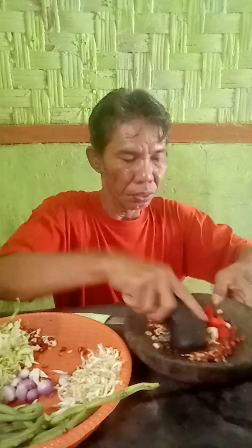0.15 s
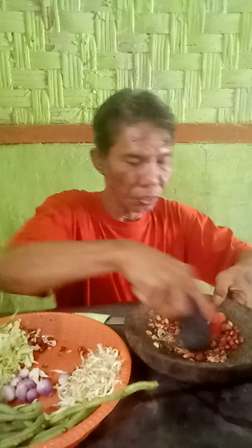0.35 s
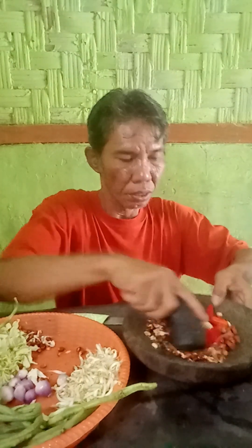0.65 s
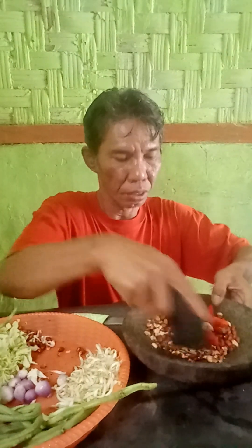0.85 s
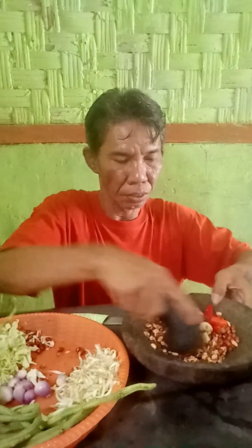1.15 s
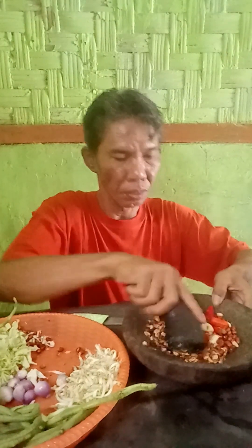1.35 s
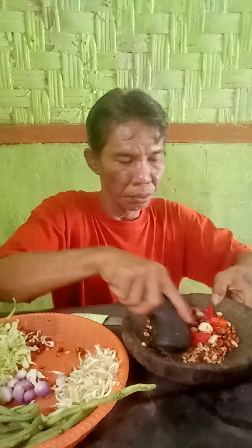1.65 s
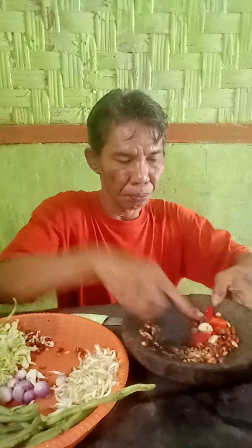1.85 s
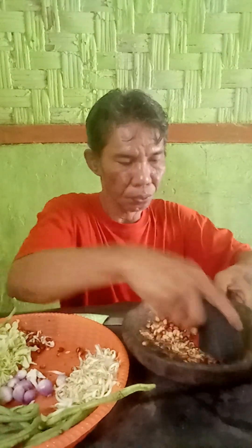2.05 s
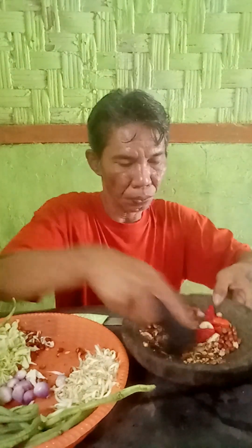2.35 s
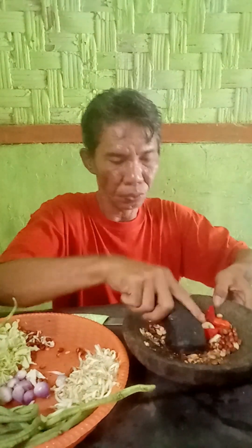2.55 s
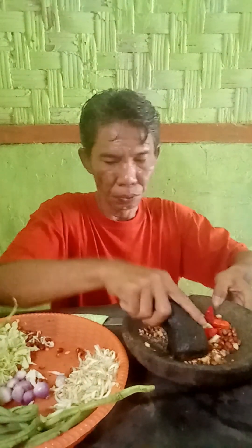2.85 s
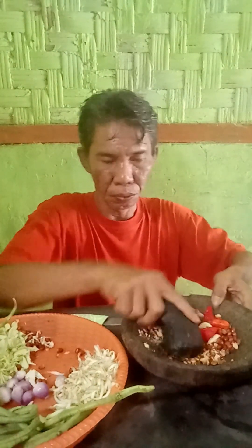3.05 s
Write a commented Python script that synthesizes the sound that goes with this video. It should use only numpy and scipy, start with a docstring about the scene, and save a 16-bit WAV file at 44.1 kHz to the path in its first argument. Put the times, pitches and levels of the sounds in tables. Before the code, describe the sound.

A stone pestle grinds nuts and spices in a stone mortar, close by in a small room. Quick rasping, rumbling strokes alternate with ringing knocks and crunching kernels, with harder knocks about halfway and near the end.

```python
"""A shallow stone mortar on a table in a small room, close to one microphone: nuts and spices are crushed.
From the start the stone pestle is pushed over the grit in quick strokes: the mortar rumbles and judders,
stone rasps on stone and the pestle sings. Between strokes it lands with a knock and a short ring, while
kernels crunch and crack and chillies pop. It lands hard about halfway through and again near the end,
where a last run of squeaking strokes and a knock close the three seconds."""
import sys
import numpy as np
from scipy import signal
from scipy.fft import rfft, irfft
from scipy.io import wavfile
from scipy.ndimage import uniform_filter1d, map_coordinates

SR = 44100
rng = np.random.default_rng(int(sys.argv[2]) if len(sys.argv) > 2 else 0)


def generate_wav(signal):
    """Clip the signal to [-1, 1] and save it as 16-bit WAV at the path in sys.argv[1]."""
    frames = np.transpose(np.atleast_2d(signal))
    scaled = np.clip(frames, -1, 1) * 32767
    pcm = np.round(scaled).astype(np.int16)
    wavfile.write(sys.argv[1], SR, pcm)


N = 141120
T = np.arange(N) / SR
CUTOFF_HZ = 15700   # top of the microphone's range
GRIT_PER_S, GRIT_SPREAD_DB = 5500, 2
ROLL_DEPTH, ROLL_HZ = 0.011, 44.64   # the rolling point of contact pulls the resonances about

# Resonances of the table, the mortar's body, the stone faces and the pestle: pitch_hz, level_db, t60_s
TABLE_MODES = [(153.1, -3, 0.12), (195.9, 0, 0.072), (255.4, 1, 0.048)]
MORTAR_MODES = [(314, -7, 0.089), (406.5, 2.5, 0.067), (464, 1, 0.13), (533, -10, 0.023)]
FACE_MODES = [(734, -3.5, 0.026), (916, -2.5, 0.012), (1110, 1.5, 0.027), (1271, -1.5, 0.015),
              (1370, -0.5, 0.02), (1686, 1.5, 0.027), (1811, -0.5, 0.064), (2444, -6, 0.0048)]
PESTLE_MODES = [(2086, 14, 0.037), (2194.5, 0.5, 0.11)]
# High resonances of the mortar's bowl: pitch_hz, level_db, t60_s
BOWL_MODES = [(2370, 0, 0.0032), (3060, 6, 0.0035), (4700, -9, 0.0079), (5096, 3.5, 0.012),
              (5265, 2, 0.0035), (5800, -1, 0.0076)]
# Spectrum of breaking crumbs: frequency_hz, level_db
CRUNCH_SPECTRUM = [(300, -12), (2000, -8), (4000, -1), (6500, -2), (8500, -6), (13500, 1), (15000, -9),
                   (15700, -31)]
# Pushes of the pestle: peak_s, rise_s, fall_s, boom_db, rumble_db, rasp_db, ring_db, grit_db, crunch_db
GRINDING_STROKES = [ (.005, 0.06, 0.049, -33, -27.5, -38, -46, -40.5, -37),
                    (0.096, 0.009, 0.017, -26, -33, -30, -23, -50, -43),
                    (.122, 0.043, 0.018, -31, -30.5, -28, -42, -35, -42),
                    (0.164, 0.025, 0.031, -32.5, -19.5, -21.5, -26, -31, -38),
                    (0.196, 0.039, 0.046, -35.5, -30.5, -55, -66, -45.5, -46),
                    (0.272, 0.04, 0.014, -33.5, -54, -42, -65, -53, -57),
                    (0.374, 0.0058, 0.027, -23.5, -23, -24, -25, -39, -35.5),
                    (0.439, 0.046, 0.042, -30, -30, -31.5, -38, -37, -32.5),
                    (0.495, 0.015, 0.017, -30.5, -30.5, -64, -67, -50, -48),
                    (0.538, 0.028, 0.049, -40, -29, -36.5, -39.5, -37, -34),
                    (0.645, 0.013, 0.043, -56, -37, -42.5, -69, -43.5, -48),
                    (0.679, 0.053, 0.093, -38, -48, -53, -51.5, -62, -55),
                    (0.743, 0.014, 0.053, -32.5, -25, -37.5, -44.5, -42.5, -40),
                    (0.97, 0.0084, 0.027, -30.5, -24.5, -30.5, -30, -62, -38),
                    (1.024, 0.043, 0.065, -31.5, -35.5, -41, -45, -42.5, -40.5),
                    (1.114, 0.014, 0.039, -43, -30, -44, -45, -38, -36),
                    (1.204, 0.012, 0.092, -37, -37, -61, -68, -52.5, -75),
                    (1.264, 0.038, 0.049, -34.5, -45, -50.5, -44.5, -60, -58),
                    (1.38, 0.05, 0.042, -36, -30.5, -39, -46, -48.5, -44),
                    (1.616, 0.0061, 0.08, -57, -25, -28, -35, -51, -54),
                    (1.64, 0.0047, 0.028, -28, -20.5, -26.5, -18, -45, -57),
                    (1.726, 0.014, 0.028, -28, -19.5, -28, -44, -45, -57),
                    (1.741, 0.0086, 0.034, -27, -15.5, -22.5, -23, -46, -39),
                    (1.822, 0.002, 0.054, -31, -31, -55, -63, -56, -68),
                    (1.939, 0.022, 0.037, -24, -33, -32.5, -32, -39, -38),
                    (1.968, 0.013, 0.033, -37, -21.5, -36, -63, -41.5, -64),
                    (2.014, 0.0045, 0.011, -24.5, -19, -40, -54, -62, -75),
                    (2.056, 0.025, 0.054, -32, -30.5, -35.5, -53, -67, -85),
                    (2.191, 0.0073, 0.054, -35.5, -39, -32, -27.5, -64, -53),
                    (2.231, 0.029, 0.069, -34.5, -26, -32.5, -38, -41, -44.5),
                    (2.328, 0.027, 0.038, -37.5, -31, -42, -58, -41.5, -42),
                    (2.42, 0.047, 0.21, -47.5, -47.5, -62, -72, -69, -65),
                    (2.482, 0.015, 0.056, -43, -38.5, -39.5, -28.5, -59, -46),
                    (2.559, 0.044, 0.044, -30.5, -36, -48.5, -39, -61, -47),
                    (2.596, 0.024, 0.042, -36, -28, -45, -60, -45.5, -44),
                    (2.834, 0.023, 0.017, -29, -27, -31.5, -26, -40, -45),
                    (2.87, 0.018, 0.015, -48, -20.5, -22.5, -18, -39, -42),
                    (2.894, 0.069, 0.04, -29.5, -20.5, -28, -25.5, -38.5, -47),
                    (3.056, 0.033, 0.044, -39, -32, -43.5, -31.5, -63, -64),
                    (3.081, 0.019, 0.046, -32.5, -27, -31.5, -36, -46, -56),
                    (3.169, 0.029, 0.024, -56, -31, -39, -33, -46, -57)]


def grinding():
    """Grit under the pestle excites table, mortar, stone faces and pestle, while crumbs break."""
    power = sum(np.outer(from_db(levels), swell(peak, rise, fall)) ** 2
                for peak, rise, fall, *levels in GRINDING_STROKES)
    boom, rumble, rasp, song, sand, crunch = power
    clumps = rms_one(from_db(2 * wander(hz=148))) ** 2   # crumbs break in clusters
    grit = grains(GRIT_PER_S, GRIT_SPREAD_DB)
    crumbs = grains(per_s=2000, spread_db=1.5)
    layers = [(boom, ring(ring(grit, TABLE_MODES), TABLE_MODES)),
              (rumble, ring(grit, MORTAR_MODES)),
              (rasp, waver(ring(grit, FACE_MODES), ROLL_DEPTH, ROLL_HZ)),
              (song, waver(ring(grit, PESTLE_MODES), ROLL_DEPTH, ROLL_HZ)),
              (sand * clumps, ring(crumbs, BOWL_MODES)),
              (crunch * clumps, colour(crumbs, CRUNCH_SPECTRUM))]
    return sum(np.sqrt(layer_power) * steady(sound) for layer_power, sound in layers)


# The stone's clink, its high overtones and the mortar's rim: pitch_hz, level_db, t60_s
CLINK_MODES = [(4505, 0, 0.055)]
OVERTONE_MODES = [(7200, -1.5, 0.02), (7480, 6.5, 0.04), (9430, -9, 0.034), (10550, -2.5, 0.014),
                  (11280, -8, 0.018), (12900, -7, 0.009), (14400, -6, 0.023)]
RIM_MODES = [(2621, -2, 0.15), (3200, -6.5, .1), (3430, -10.5, 0.047), (4980, -6, 0.14)]
# The pestle lands: start_s, thud_db, clack_db, ring_db, ring_pitch_hz, clink_db, overtone_db
LANDINGS = [(0.24, -27.5, -33.5, -57, 2110, -75, -70), (0.3634, -31.5, -49, -29, 2080, -53, -50),
            (0.9592, -39, -34, -36.5, 1920, -65, -62), (1.035, -37, -31, -30.5, 1945, -54, -46),
            (1.303, -32.5, -45, -36.5, 2100, -58, -54.5), (1.558, -19.5, -25.5, -19, 2090, -40, -49.5),
            (1.8394, -36.5, -30, -23.5, 2095, -44.5, -38.5), (2.158, -43, -21.5, -18.5, 2048, -52, -51),
            (2.466, -48, -38, -31.5, 2060, -43, -51), (2.7771, -23, -20.5, -17, 2150, -32.5, -46),
            (2.8266, -23.5, -24.5, -23, 2080, -38, -52), (2.984, -71, -60, -37, 2120, -48, -46.5),
            (3.013, -39.5, -45, -33, 2020, -62, -49), (3.193, -34, -45, -27, 2140, -36, -43)]


def knocks():
    """Stone meets stone: a clack, the pestle's ring, the rim's after-ring, then a thud on the table."""
    out, t = np.zeros(N), T[:SR // 4]
    click = signal.unit_impulse(len(t))
    chatter = dict(depth=0.0097, hz=220)   # a landing pestle chatters, which roughens its ring
    thud = ring(soften(click, 1180), MORTAR_MODES) + from_db(-8) * ring(soften(click, 450), TABLE_MODES)
    for start, thud_db, clack_db, ring_db, ring_hz, clink_db, overtone_db in LANDINGS:
        skitter = noise_burst(t, t60_s=0.1)   # the pestle skitters on grit as it lands
        contact = click + from_db(-1.5) * skitter / np.linalg.norm(skitter)
        cushioned = soften(contact, 3200)
        faces = [(hz, db + rng.normal(0, 0.37), t60 * 0.21) for hz, db, t60 in FACE_MODES]
        clack = ring(soften(contact, 2110), faces)
        pestle = from_db(ring_db) * struck(ring(cushioned, PESTLE_MODES, ring_hz / PESTLE_MODES[0][0]))
        clink = from_db(clink_db) * struck(ring(contact, CLINK_MODES))
        # the overtones shift with each point of contact, and lie lower when the pestle is not pressed down
        shifted = [(hz * (1 + rng.normal(0, 0.018)), db, t60) for hz, db, t60 in OVERTONE_MODES]
        overtones = ring(contact, shifted, tuning=0.98)
        add(out, start, from_db(clack_db) * struck(clack))
        add(out, start, waver(pestle + clink, **chatter))
        add(out, start, from_db(overtone_db) * struck(waver(overtones, **chatter)))
        add(out, start, from_db(ring_db - 20) * struck(ring(cushioned, RIM_MODES)))
        add(out, start + 0.00363, from_db(thud_db) * struck(thud))
    return out


# Resonances of the stone's squeak: pitch_hz, level_db, t60_s
SQUEAK_MODES = [(5030, 0.18, 0.032), (5346, -2.2, 0.017)]
# Slides on bare stone: peak_s, rise_s, fall_s, overtone_pitch_hz, clink_db, squeak_db, overtone_db
BARE_SLIDES = [(0.099, 0.018, 0.022, 7436, -47, -42, -40.5), (0.166, .032, 0.047, 7507, -38, -32.5, -40.5),
               (1.636, 0.019, 0.036, 7430, -39.5, -36.5, -37), (1.743, .04, 0.036, 7440, -45, -44, -41),
               (2.487, 0.02, 0.047, 7090, -37, -53, -53), (2.885, .04, 0.044, 7480, -39.5, -35, -37),
               (3.073, 0.035, 0.046, 7280, -52, -43, -45), (3.169, 0.02, 0.026, 7400, -50, -46, -41.5)]


def skids():
    """Bare stone catches on stone: the high modes sing, the overtones shifting with each stroke's grip."""
    shapes = [swell(peak, rise, fall) ** 2 for peak, rise, fall, *_ in BARE_SLIDES]
    overtone_hz, clink_db, squeak_db, overtone_db = np.transpose(BARE_SLIDES)[3:]
    grip = overtone_hz @ shapes / sum(shapes) / OVERTONE_MODES[1][0]
    catches = grains(GRIT_PER_S, GRIT_SPREAD_DB)
    voices = [(clink_db, CLINK_MODES, 1), (squeak_db, SQUEAK_MODES, 1), (overtone_db, OVERTONE_MODES, grip)]
    out = 0
    for db, modes, tuning in voices:
        singing = waver(ring(catches, modes), ROLL_DEPTH, ROLL_HZ, tuning)
        out = out + np.sqrt(from_db(db) ** 2 @ shapes) * steady(singing)
    return out


# Brief hums of the mortar under a juddering pestle: peak_s, rise_s, fall_s, pitch_hz, level_db
JUDDER_HUMS = [(0.17, 0.009, 0.01, 445, -14.5), (0.244, 0.0051, 0.0053, 419, -18),
               (1.384, 0.026, 0.012, 402, -17.5), (1.749, 0.004, 0.034, 429, -17),
               (2.053, 0.0052, 0.014, 412.3, -13.5), (3.104, 0.033, 0.018, 399.3, -22.5)]


def judders():
    """The pestle sticks and slips in step with the mortar's main resonance."""
    clock = np.cumsum(1 + 0.0298 * wander(hz=99)) / SR   # the pitch wobbles by about 3 percent
    return sum(from_db(db) * swell(peak, rise, fall) * np.sqrt(2) * np.sin(2 * np.pi * hz * clock)
               for peak, rise, fall, hz, db in JUDDER_HUMS)


# Spectrum of a splitting kernel: frequency_hz, level_db
CRACK_SPECTRUM = [(300, -5.5), (2600, 0), (4500, 2), (8500, -6.5), (14000, 1), (16000, -8)]
# Kernels split: start_s, level_db, lowpass_hz
KERNEL_CRACKS = [(0.3653, -32, 14900), (0.544, -28, 12400), (0.9587, -36.5, 14600), (1.0355, -28.5, 2950),
                 (1.205, -46.5, 4030), (1.84, -38, 9000), (1.924, -41, 15000), (2.022, -28.5, 9100),
                 (2.08, -40.5, 4350), (2.243, -36.5, 7650)]


def cracks():
    """A kernel splits in a very short, bright burst."""
    out = np.zeros(N)
    for start, db, lowpass_hz in KERNEL_CRACKS:
        burst = colour(noise_burst(T[:SR // 20], t60_s=0.023), CRACK_SPECTRUM)
        add(out, start, from_db(db) * struck(soften(burst, lowpass_hz)))
    return out


# Wet flesh gives way with a small rising pop: peak_s, pitch_at_peak_hz, level_db
CHILLI_POPS = [(0.243, 1100, -27.5), (.375, 930, -26), (0.645, 1014, -30.5), (1.036, 1042, -22.5),
               (1.965, 850, -23)]
POP_OCTAVES_PER_S = 99.5


def pops():
    """Air pockets in the squeezed chillies close, so their pitch shoots up."""
    out = 0
    for peak, hz, db in CHILLI_POPS:
        pitch = hz * 2 ** np.clip((T - peak) * POP_OCTAVES_PER_S, -0.5, 1)
        chirp = np.sqrt(2) * np.sin(2 * np.pi * np.cumsum(pitch) / SR)
        out = out + from_db(db) * swell(peak, rise_s=0.0043, fall_s=0.0085) * chirp
    return out


# Reflections from the table and near wall, then from the room: t60_s, level_db, delay_s
ROOM_REFLECTIONS = [(0.074, -6, 0.0033), (0.298, -19, 0.015)]
# Tone of the reflected sound: frequency_hz, gain_db
REFLECTION_SPECTRUM = [(100, 7), (400, -0.5), (2000, -6), (6000, 0), (15000, -6)]


def room(x):
    """The small room returns a dense early cluster of reflections and a fainter, longer tail."""
    t, response = T[:SR // 2], 0
    for t60, db, delay in ROOM_REFLECTIONS:
        tail = noise_burst(t, t60) * (t > delay)
        response = response + from_db(db) * tail / np.linalg.norm(tail)
    return signal.fftconvolve(x, colour(response, REFLECTION_SPECTRUM))[:N]


# Spectrum of the room's background: frequency_hz, level_db
ROOM_TONE_SPECTRUM = [(20, 12), (45, 4.5), (90, 1.5), (155, 6), (220, -7.5), (420, -20), (800, -18.5),
                      (2000, -24.5), (5000, -36), (15000, -55)]


def room_tone():
    """A faint, steady, low noise lies behind the mortar."""
    return from_db(-47) * rms_one(colour(rng.standard_normal(N), ROOM_TONE_SPECTRUM))


def from_db(db):
    """Decibels to gain."""
    return 10 ** (np.asarray(db) / 20)


def rms_one(x):
    """Scale to unit rms."""
    return x / np.sqrt(np.mean(x ** 2) + 1e-20)


def steady(x):
    """Hold the level at one while keeping the fine grain."""
    return x / np.sqrt(np.abs(uniform_filter1d(x ** 2, 500)) + 1e-12)


def struck(x):
    """Scale a blow to unit rms over its first 8.2 ms."""
    return x / np.sqrt(np.mean(x[:int(0.0082 * SR)] ** 2))


def soften(x, hz):
    """Gentle low-pass, as of a cushioned contact."""
    return signal.sosfilt(signal.butter(2, min(hz, CUTOFF_HZ), fs=SR, output="sos"), x)


def colour(x, points):
    """Minimum-phase filter through (frequency_hz, gain_db) points."""
    hz, db = np.transpose(points)
    size = 4096
    curve_db = np.interp(np.log(np.fft.rfftfreq(size, 1 / SR) + 1), np.log(hz), db)
    cepstrum = irfft(np.log(from_db(curve_db)))
    cepstrum[1:size // 2] *= 2
    cepstrum[size // 2 + 1:] = 0
    return signal.fftconvolve(x, irfft(np.exp(rfft(cepstrum))))[:len(x)]


def ring(x, modes, tuning=1):
    """Parallel modes of alternating sign; each level sets the mode's energy."""
    out = 0
    for k, (hz, db, t60) in enumerate(modes):
        radius = np.exp(-np.log(1000) / (t60 * SR))
        angle = 2 * np.pi * hz * tuning / SR
        mode = signal.lfilter([1, 0, -1], [1, -2 * radius * np.cos(angle), radius ** 2], x + 1e-18)
        out = out + (-1) ** k * from_db(db) * np.sqrt(1 - radius) * mode
    return out


def grains(per_s, spread_db):
    """Random clicks of uneven size."""
    sizes = from_db(spread_db * np.minimum(rng.exponential(1, N), 5)) * rng.choice([-1, 1], N)
    return sizes * (rng.random(N) < per_s / SR)


def noise_burst(t, t60_s):
    """White noise that dies away by 60 dB in t60_s."""
    return rng.standard_normal(len(t)) * np.exp(-np.log(1000) * t / t60_s)


def swell(peak_s, rise_s, fall_s):
    """Pressure builds to a peak and dies away; rise and fall each span 20 dB."""
    before = (np.maximum(peak_s - T, 0) / rise_s) ** 1.29
    after = np.maximum(T - peak_s, 0) / fall_s
    return from_db(-20 * np.minimum(before + after, 10))


def wander(hz, size=N):
    """Random drift of unit rms, mostly slower than hz."""
    return rms_one(soften(rng.standard_normal(size), hz))


def waver(x, depth, hz, tuning=1):
    """Let a ringing sound's pitch wander about its tuning."""
    speed = tuning * (1 + depth * wander(hz, len(x)))
    return map_coordinates(x, [np.cumsum(speed)], order=3, mode="mirror")


def add(out, start_s, x):
    """Mix a sound in at a time."""
    i = int(start_s * SR)
    out[i:i + len(x)] += x[:max(N - i, 0)]


def scene():
    """The mortar close by, its reflections and the room tone behind it, in mono."""
    mortar = grinding() + skids() + knocks() + judders() + cracks() + pops()
    background = room_tone()
    return (mortar + room(mortar) + background)[None]


def record(dry):
    """The microphone thins the bass and cuts the top."""
    thin = signal.sosfilt(signal.butter(2, 130, "high", fs=SR, output="sos"), dry)
    return signal.sosfilt(signal.ellip(10, 0.2, 80, CUTOFF_HZ, fs=SR, output="sos"), thin)


dry = scene()
out = record(dry)
generate_wav(out)
```